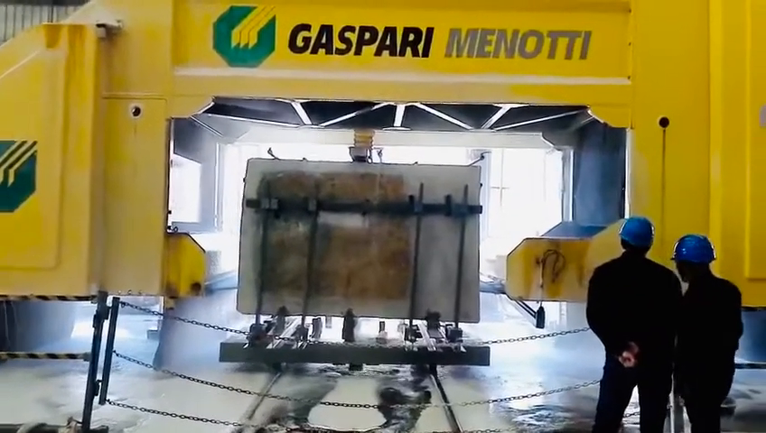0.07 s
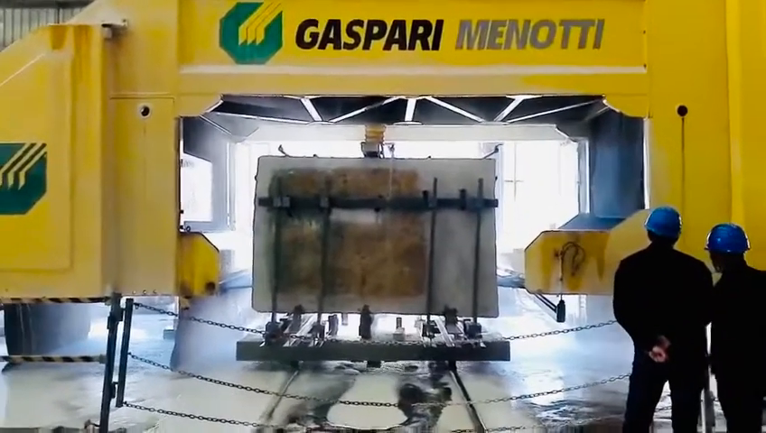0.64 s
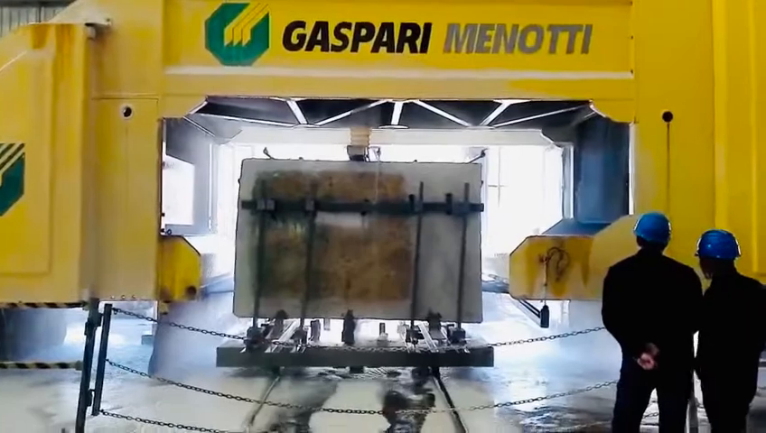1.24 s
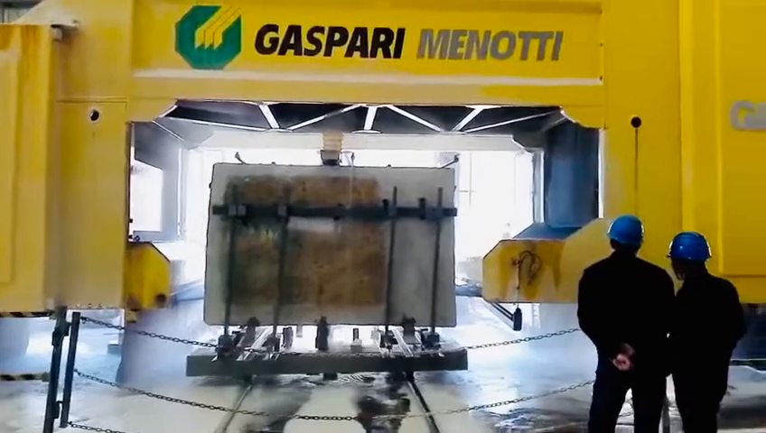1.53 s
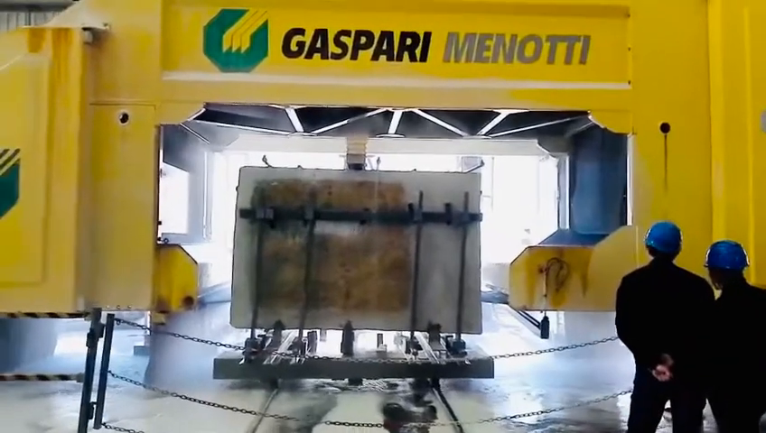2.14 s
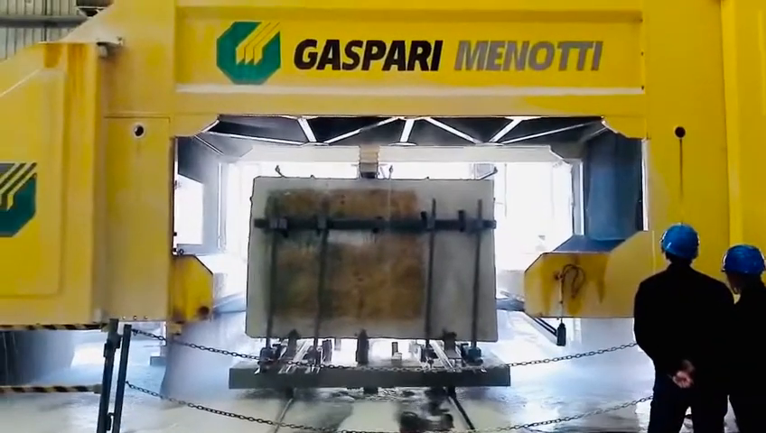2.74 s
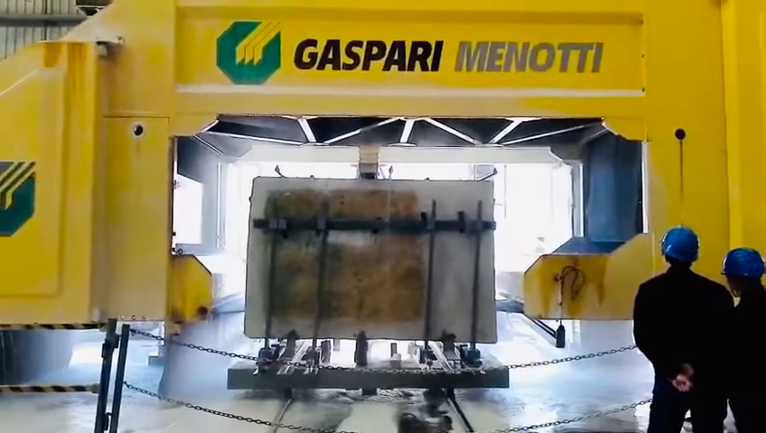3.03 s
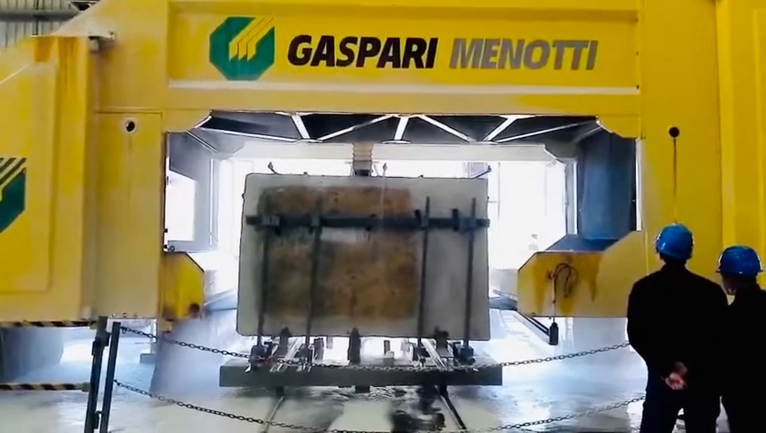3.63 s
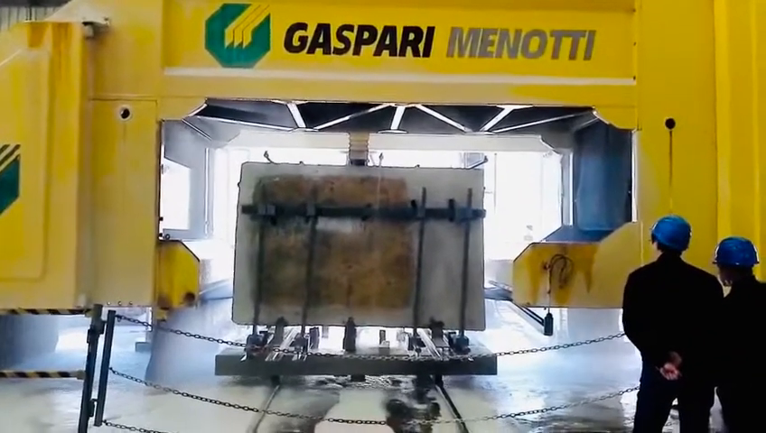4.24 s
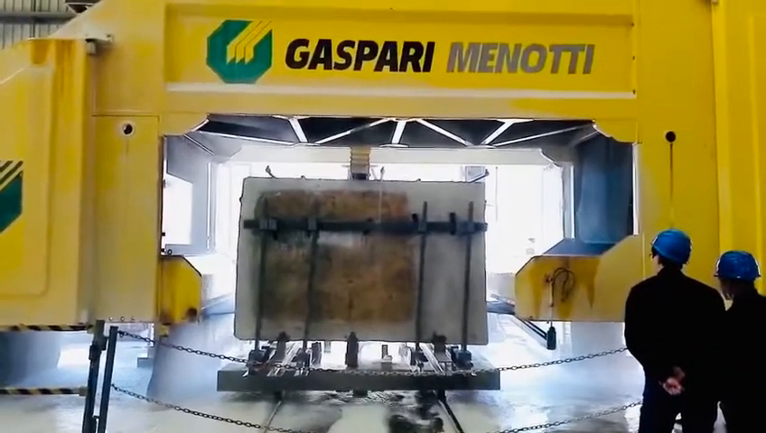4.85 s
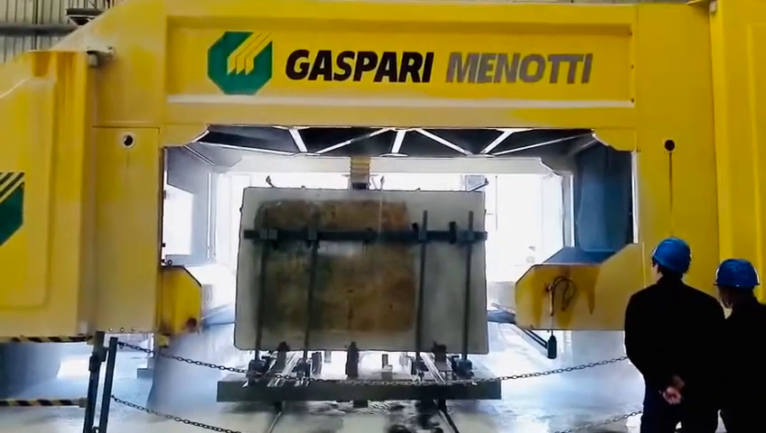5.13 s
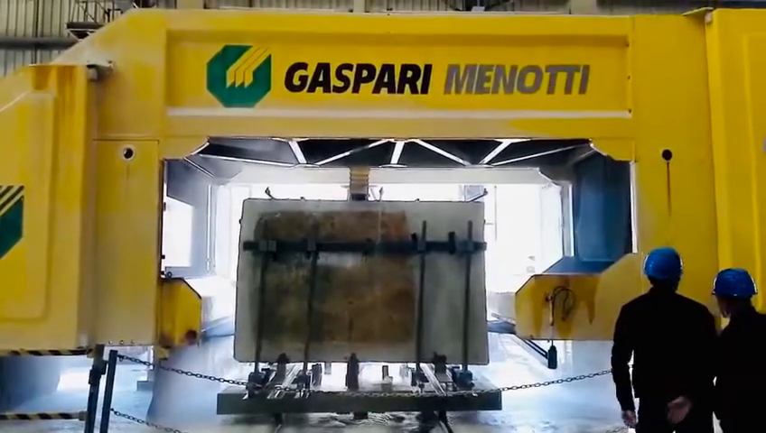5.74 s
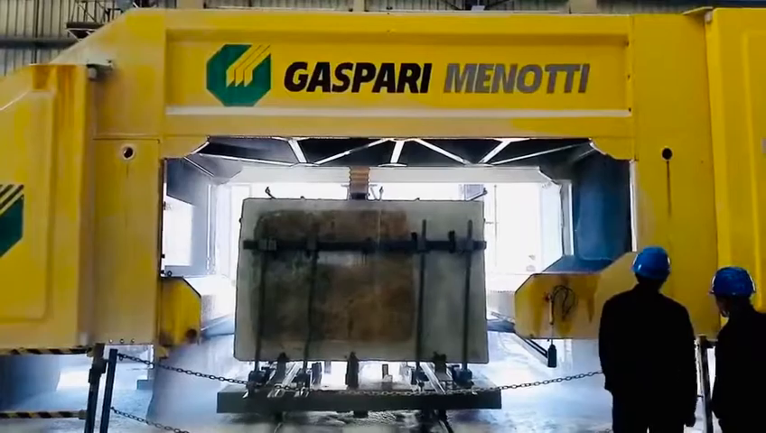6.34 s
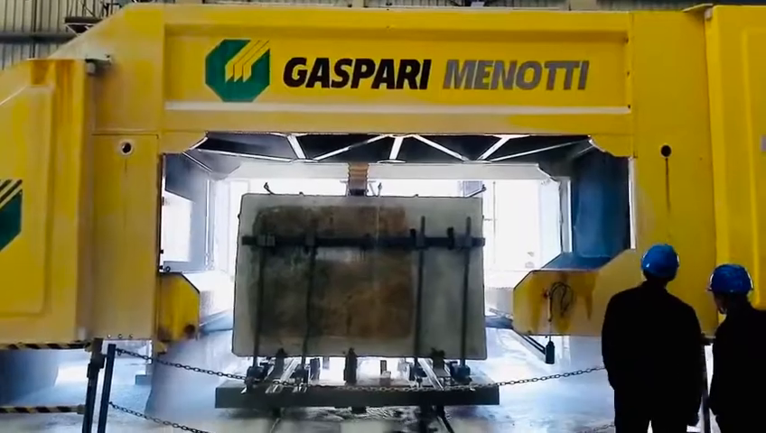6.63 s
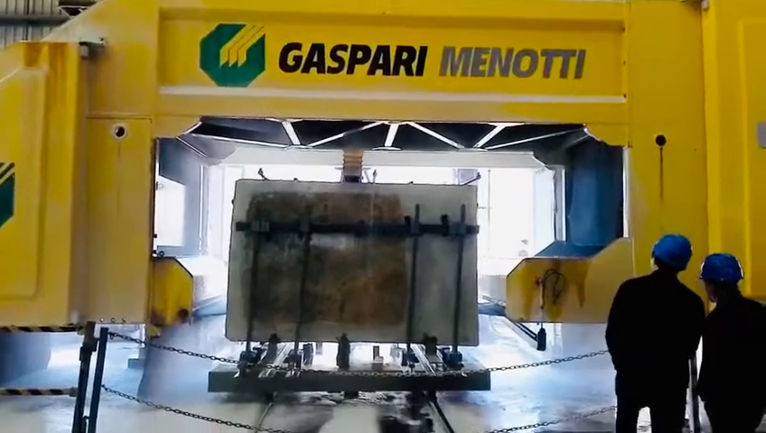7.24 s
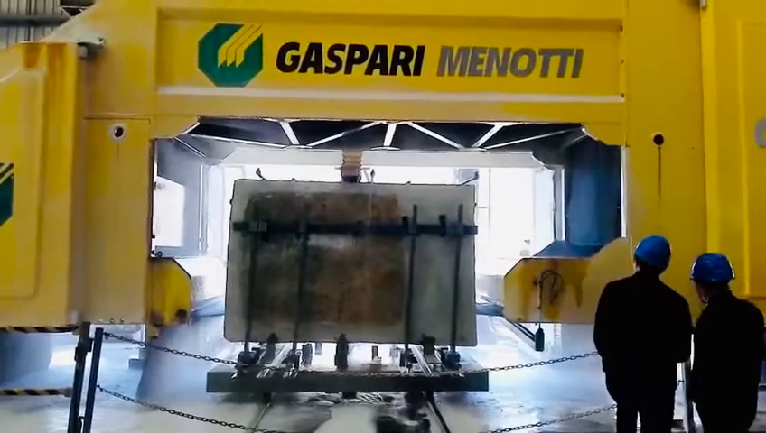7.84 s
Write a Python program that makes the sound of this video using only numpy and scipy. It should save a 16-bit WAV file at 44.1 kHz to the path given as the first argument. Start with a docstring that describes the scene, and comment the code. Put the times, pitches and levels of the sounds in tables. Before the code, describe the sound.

A large wire saw cuts stone in a factory hall for about eight seconds, loud and close enough to overload the microphones slightly. From the first moment there is a wide, steady grinding roar with the hiss of wet wires. Over it the drive holds a fairly high whine at one pitch, fluttering quickly, swelling and sinking, mostly to the left. Short, higher squeals flare at uneven intervals, mostly to the right, the strongest at about 0.1, 2.3, 4.7, 6.1 and 6.4 seconds, with another just before the end. A motor and pumps hum underneath. At about 0.5 seconds a machine panel adds a faint low drone that fades by 1 second. Between 1 and 1.5 seconds the motor hum grows a little louder under load and stays up. The saw runs on without a pause to the end.

```python
"""A multi-wire saw cuts a stone block in a factory hall, close enough to overload the microphones.
From the start, wet wires hiss over the roar of the hall, the toothed drive whines near 1 kHz and
flutters with each turn of its shaft, and a motor and pumps hum underneath. Almost at once an overtone
flares into the first of many squeals. Half a second in, a panel of the frame drones briefly.
After the first second the motor grows louder under load, and the saw runs on to the end."""
import sys
import numpy as np
from scipy import signal
from scipy.fft import rfft, irfft
from scipy.io import wavfile
from scipy.ndimage import uniform_filter1d

SR = 44100
rng = np.random.default_rng(int(sys.argv[2]) if len(sys.argv) > 2 else 0)


def wav_record(signal):
    """Record a signal, one row per channel, as 16-bit PCM in the file named by sys.argv[1]."""
    frames = np.transpose(np.atleast_2d(signal))
    bounded = np.clip(frames, -1, 1)
    # unit amplitude maps onto the largest positive 16-bit level
    quanta = np.round(bounded * 32767).astype(np.int16)
    wavfile.write(sys.argv[1], SR, quanta)


N = 351918
TIME, HZ = np.arange(N) / SR, np.fft.rfftfreq(N, 1 / SR)


def amp(db):
    """The decibel scale: 20 dB is a factor of ten in amplitude."""
    return 10 ** (np.asarray(db) / 20)


def unit_rms(x):
    """Normalisation: each channel is scaled to rms 1."""
    return x / np.sqrt(np.mean(abs(x) ** 2, -1, keepdims=True) + 1e-20)


def over_frequency(points):
    """Interpolation of (Hz, value) rows along a logarithmic frequency axis."""
    hz, value = np.transpose(points)
    return np.interp(np.log(HZ + 1), np.log(hz + 1), value)


def over_time(points):
    """Linear interpolation of (seconds, value) rows over all samples."""
    return np.interp(TIME, *np.transpose(points))


def white_spectra():
    """Incoherent sources: the spectra of two independent white noises."""
    return rfft(rng.standard_normal((2, N)))


def drift(rate_hz):
    """Low-pass noise: a random curve of rms 1 that moves at up to about rate_hz."""
    count = 2048
    hz = np.fft.rfftfreq(count, TIME[-1] / count)
    low_pass = (hz > 0) / (1 + (hz / rate_hz) ** 2)
    slow = irfft(rfft(rng.standard_normal(count)) * low_pass)
    return np.interp(TIME, np.linspace(0, TIME[-1], count), unit_rms(slow))


def pan(level_db, lean_db):
    """Constant-power panning: left and right levels in dB that differ by lean_db."""
    left_db = level_db + 10 * np.log10(2 / (1 + amp(-lean_db) ** 2))
    return left_db, left_db - lean_db


def hall_tone(cycles, sides_db, lead_rad, waver_db, blur_rad):
    """Multipath interference: a sine wavers in level and phase at each of the two microphones."""
    start_rad = 2 * np.pi * rng.random()
    channels = []
    for db, shift_rad in zip(sides_db, (lead_rad / 2, -lead_rad / 2)):
        phase = 2 * np.pi * cycles + start_rad + shift_rad + blur_rad * drift(0.84)
        channels.append(np.sqrt(2) * amp(db + waver_db * drift(9.9)) * np.sin(phase))
    return np.array(channels)


# Spectrum of the hall's roar and the wires' hiss. Each row: frequency in Hz, relative density in dB.
ROAR_SPECTRUM = [(25, -62.5), (80, -58), (200, -55.5), (290, -56), (600, -51.5), (830, -51.5), (1020, -44),
                 (1200, -46.5), (1600, -49), (2000, -41.5), (2550, -47.5), (3400, -49), (4400, -47),
                 (5050, -42.5), (6500, -50.5), (8500, -56.5), (10300, -58), (14000, -69.5)]
# Balance of the roar. Each row: frequency in Hz, left minus right level in dB.
ROAR_BALANCE = [(300, 0), (620, 2), (1050, 3), (1600, 0.5), (2000, -3), (2800, -3.5), (4300, -5.5),
                (5300, -0.8), (6300, 2.5), (8500, -0.6), (13000, 0)]
# The hall's diffuse field. Each row: frequency in Hz, left-right correlation from -1 to 1.
HALL_CORRELATION = [(60, 1), (210, 0.91), (400, -0.022), (580, -0.51), (850, 0.19), (1200, 0.23),
                    (1650, 0.33), (2050, -0.58), (2900, 0.16), (3500, -0.022), (4300, -0.046),
                    (5200, 0.039), (6100, -0.098), (7300, 0.096), (8500, -0.069)]
def grinding_roar(patchy_db=0.97, surge_db=0.02, bright_hz=2500):
    """Superposition: countless diamond beads grind wet stone and blend into the hall's diffuse field."""
    left, independent = white_spectra() * np.sqrt(SR / 2)
    correlation = over_frequency(HALL_CORRELATION)
    right = correlation * left + np.sqrt(1 - correlation ** 2) * independent
    density_db = over_frequency(ROAR_SPECTRUM) + np.outer([0.5, -0.5], over_frequency(ROAR_BALANCE))
    steady = irfft(np.array([left, right]) * amp(density_db), N)
    # The treble shifts in small patches.
    hz, frame_s, spectrogram = signal.stft(steady, SR, nperseg=512)
    patches = rng.standard_normal((len(frame_s), len(hz)))
    patches = uniform_filter1d(patches, size=11, axis=0)  # across time
    patches = uniform_filter1d(patches, size=8, axis=1).T  # across frequency
    surge = np.interp(frame_s, TIME, drift(19))
    treble = hz[:, None] ** 2 / (hz[:, None] ** 2 + bright_hz ** 2)
    flicker_db = treble * (patchy_db * patches / patches.std() + surge_db * surge)
    return signal.istft(spectrogram * amp(flicker_db), SR)[1][:, :N]


MESH_HZ, TEETH = 1010.1, 76
# The whine's swells in the hall's standing waves. Each row: time in seconds, relative level in dB.
WHINE_SWELLS = [(0.0, -25), (0.14, -23.0), (0.25, -16.5), (0.5, -26.5), (0.74, -14.5), (1.12, -16.5),
                (1.32, -25.5), (1.56, -13.0), (1.8, -20.5), (1.92, -14.5), (2.36, -31), (2.6, -20.5),
                (2.96, -17), (3.36, -25.5), (3.56, -20), (3.66, -27), (4.04, -15.5), (4.2, -29),
                (4.34, -20.5), (4.5, -29), (5.7, -27), (5.92, -17), (6.26, -19.5), (6.4, -24), (6.7, -26.5),
                (6.88, -14), (7.4, -30), (7.6, -12.5), (7.98, -20)]
# Balance of the whine. Each row: time in seconds, left minus right level in dB.
WHINE_BALANCE = [(0.0, 9), (0.68, 0), (1.68, 54), (2.96, -1), (3.72, -2), (4.0, 15), (4.32, 4), (4.72, 0),
                 (5.16, 16), (5.48, 9), (7.2, -3.5), (7.97, 8)]
def drive_whine(mesh_cycles, gain_db=0.5):
    """Periodic excitation: meshing teeth radiate a tone at the rate at which they engage."""
    sides_db = pan(over_time(WHINE_SWELLS) + gain_db, over_time(WHINE_BALANCE))
    return hall_tone(mesh_cycles, sides_db, lead_rad=0.46, waver_db=1.45, blur_rad=0.44)


# Sidebands round the whine. Each row: harmonic number, half-width of the skirt in Hz,
# left level in dB, right level in dB.
SHAFT_SIDEBANDS = [(1, 15, -27.5, -33), (1, 70, -27.5, -31), (2, 55, -30.5, -27.5), (3, 20, -36, -32)]
def shaft_flutter(half_width_hz=3.0):
    """Modulation: each turn of the shaft shakes the whine, giving sidebands one shaft rate apart."""
    shaft_hz = MESH_HZ / TEETH
    off_line_hz = (HZ + shaft_hz / 2) % shaft_hz - shaft_hz / 2
    comb = 1 / (1 + (off_line_hz / half_width_hz) ** 2)
    out = np.zeros((2, N))
    for harmonic, skirt_hz, *sides_db in SHAFT_SIDEBANDS:
        off_carrier_hz = abs(HZ - round(harmonic) * MESH_HZ)
        skirt = (off_carrier_hz > shaft_hz / 2) / (1 + (off_carrier_hz / skirt_hz) ** 2)
        sidebands = unit_rms(irfft(white_spectra() * comb * skirt, N))
        out += amp(sides_db)[:, None] * sidebands
    return out


# Tones of the main motor. Each row: harmonic number, left and right relative levels in dB,
# phase lead of the left in radians.
MOTOR_HARMONICS = [(5, -30, -35, 2.0), (10, -32.5, -30, 0), (15, -29.5, -25, 1.8), (18, -38, -28.5, -2.1),
                   (20, -39, -29.5, -1.6)]
# The motor's swell under load. Each row: time in seconds, gain in dB.
MOTOR_LOAD = [(0, -3), (1, -3), (1.5, .5), (2.4, 0), (3.3, 1), (5.6, 1), (7.2, 0), (7.98, -1)]
def motor_hum(fundamental_hz=119.0, gain_db=-0.5):
    """A harmonic series: constant speed holds the motor's pitch while its level follows the load."""
    cycles = fundamental_hz * TIME
    series = sum(hall_tone(harmonic * cycles, sides_db, lead_rad, waver_db=2.0, blur_rad=0.25)
                 for harmonic, *sides_db, lead_rad in MOTOR_HARMONICS)
    return amp(gain_db + over_time(MOTOR_LOAD)) * series


# Steady tones of pumps and pulleys; the last two rows are steady sidebands seven shaft turns either side of the
# whine's octave. Each row: frequency in Hz, left level in dB, right level in dB.
STEADY_TONES = [(47.8, -45, -45), (134.5, -47, -47), (147.1, -49, -49), (233.5, -48, -47), (547.4, -40, -45),
                (752.5, -45, -41), (1926.9, -36, -32), (2113.7, -37, -35)]
def steady_hum():
    """Steady rotation: pumps and pulleys each radiate at a constant frequency, and two steady sidebands stand
    seven shaft turns either side of the whine's octave."""
    return sum(hall_tone(hz * TIME, sides_db, lead_rad=0, waver_db=2.0, blur_rad=0.56)
               for hz, *sides_db in STEADY_TONES)


# The whine's overtones between squeals. Each row: harmonic number, left level in dB, right level in dB.
RESTING_OVERTONES = [(2, -27, -27), (3, -33, -30.5), (4, -32, -27.5), (5, -33, -33.5), (6, -37, -36)]
def drive_overtones(mesh_cycles, restless_db=3.5):
    """Harmonics: whole multiples of the mesh rate rise and sink by chance and flare into squeals."""
    out = np.zeros((2, N))
    for harmonic, *rest_db in RESTING_OVERTONES:
        resting = amp([db + restless_db * drift(7.6) for db in rest_db])
        sides_db = 20 * np.log10(np.hypot(resting, squeal_gain(harmonic)))  # powers add
        out += hall_tone(harmonic * mesh_cycles, sides_db, lead_rad=1.38, waver_db=1.0, blur_rad=0.47)
    return out


# Squeals of the overtones. Each row: centre in seconds, length in seconds, harmonic number,
# peak level in dB, left minus right level in dB.
SQUEAL_EVENTS = [(0.117, 0.24, 2, -13, -16), (0.328, 0.17, 3, -21.5, -1), (0.568, 0.65, 2, -20.5, -8),
                 (0.94, 0.23, 3, -24, -4), (1.483, 0.32, 2, -21.5, -10), (2.313, 0.12, 2, -15.5, -16),
                 (2.38, 0.13, 3, -23.0, -12), (2.71, 0.16, 2, -21, 11), (2.8, 0.24, 3, -23, -11),
                 (2.944, 0.19, 2, -17.5, 3), (3.37, 0.16, 2, -19, -1), (3.905, 0.1, 2, -17.0, -12),
                 (4.673, 0.36, 2, -16.5, -15), (5.08, 0.17, 3, -26, -10), (5.28, 0.096, 2, -21, 6),
                 (5.59, 0.2, 2, -19.0, -11), (5.756, 0.11, 3, -20, -21), (6.117, 0.17, 2, -15, 2),
                 (6.423, 0.12, 2, -12.5, -10), (6.852, 0.11, 2, -17, -3), (7.198, 0.1, 3, -20, -10),
                 (7.875, 0.24, 2, -17, -16)]
def squeal_gain(harmonic, edge_db=-7.5):
    """Gaussian envelopes: each squeal stands at edge_db, relative to its peak, half a length away."""
    gain = np.zeros((2, N))
    for centre_s, length_s, squealing_harmonic, level_db, lean_db in SQUEAL_EVENTS:
        if round(squealing_harmonic) == harmonic:
            near = abs(TIME - centre_s) < 2 * length_s
            swell = amp(edge_db * (2 * (TIME[near] - centre_s) / length_s) ** 2)
            gain[:, near] += np.outer(amp(pan(level_db, lean_db)), swell)
    return gain


def panel_drone(hz=320, start_s=0.38, attack_s=0.13, hold_s=0.19, release_s=0.38):
    """Plate vibration: the tone of a frame panel swells, holds and dies back to a faint rest."""
    rest_db, hold_db = -56, -38.5
    corners_s = np.cumsum([start_s, attack_s, hold_s, release_s])
    level_db = np.interp(TIME, corners_s, [rest_db, hold_db, hold_db, rest_db])
    return hall_tone(hz * TIME, (level_db, level_db), lead_rad=0, waver_db=5.5, blur_rad=0.1)


def scene(wander_hz=0.579):
    """Linear superposition: the pressures of all the sources add at the microphones."""
    roar = grinding_roar()
    mesh_cycles = np.cumsum(MESH_HZ + wander_hz * drift(1.23)) / SR  # the drive's speed wanders slightly
    return (roar + drive_whine(mesh_cycles) + shaft_flutter() + motor_hum() + steady_hum()
            + drive_overtones(mesh_cycles) + panel_drone())


def record(dry, gain_db=1.5, limit_db=4.36, recover_db_per_s=110, mono_hz=110, cutoff_hz=14150):
    """Overload: a limiter ducks the highest peaks; what still exceeds full scale clips before a low-pass."""
    mid = dry.mean(0)
    side_high_pass = HZ / np.hypot(HZ, mono_hz)  # leaves the bass nearly mono
    side = irfft(rfft((dry[0] - dry[1]) / 2) * side_high_pass, N)
    loud = amp(gain_db) * np.array([mid + side, mid - side])
    peak_db = 20 * np.log10(abs(loud).max(0) + 1e-9)
    over_db = np.maximum(peak_db - limit_db, 0)
    recovery_db = recover_db_per_s * TIME
    duck_db = np.maximum.accumulate(over_db + recovery_db) - recovery_db  # fast attack, slower release
    clipped = np.clip(loud * amp(-uniform_filter1d(duck_db, size=32)), -1, 1)
    low_pass = signal.firwin(511, cutoff_hz, window=("kaiser", 7), fs=SR)
    return signal.oaconvolve(clipped, low_pass[None], "same")


dry = scene()
out = record(dry)
wav_record(out)
```